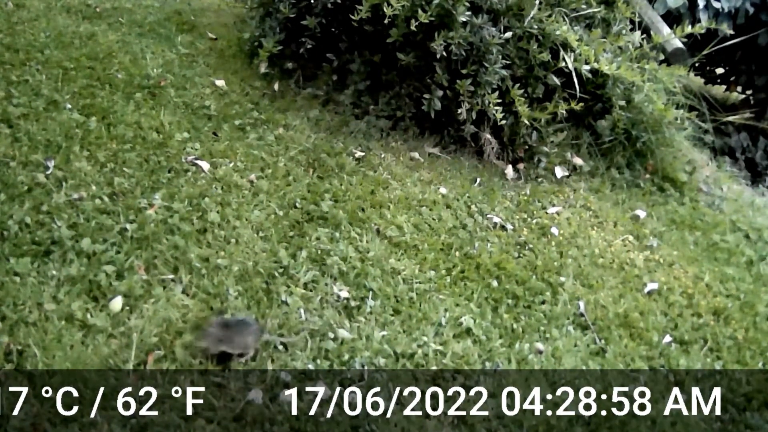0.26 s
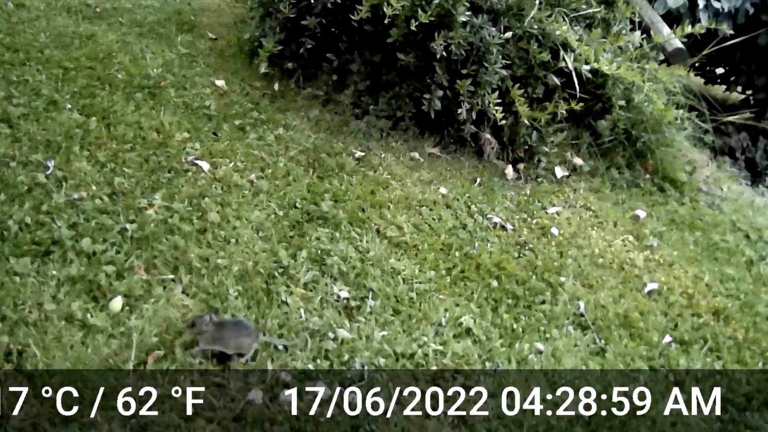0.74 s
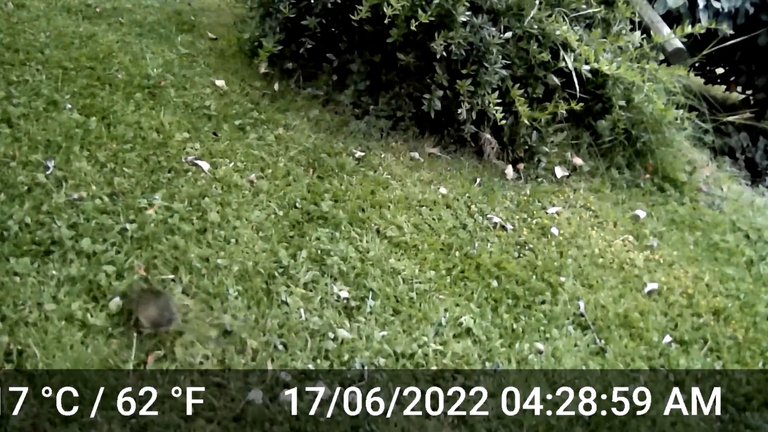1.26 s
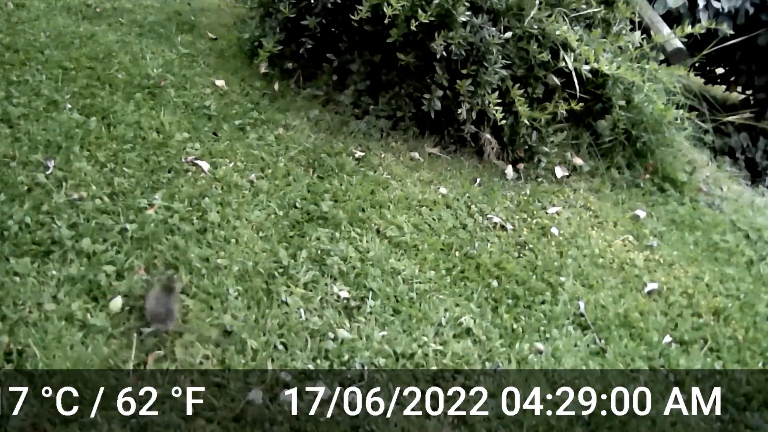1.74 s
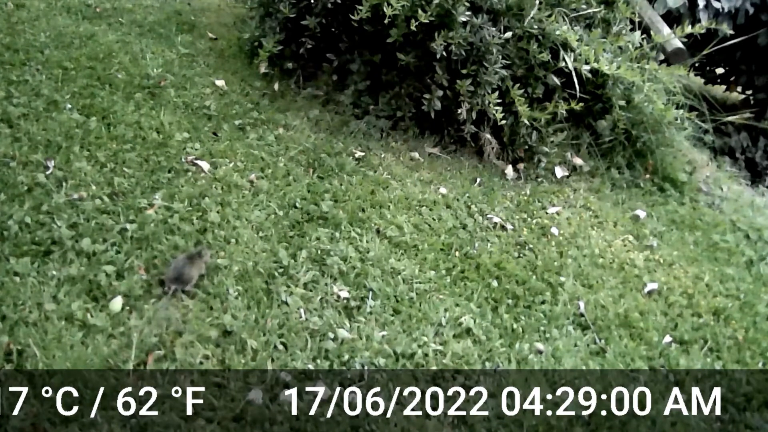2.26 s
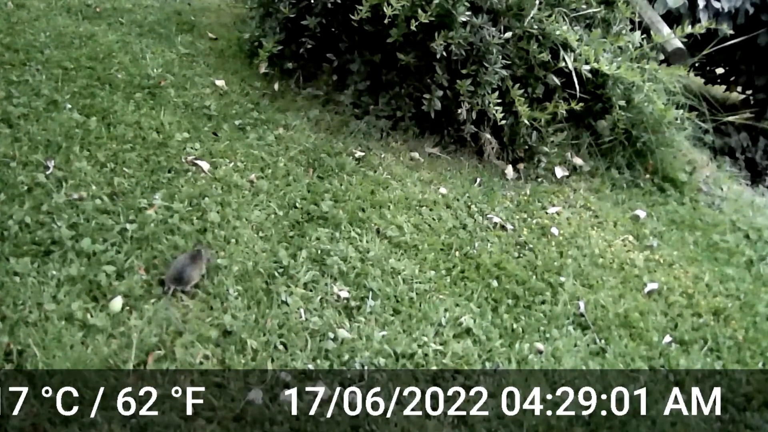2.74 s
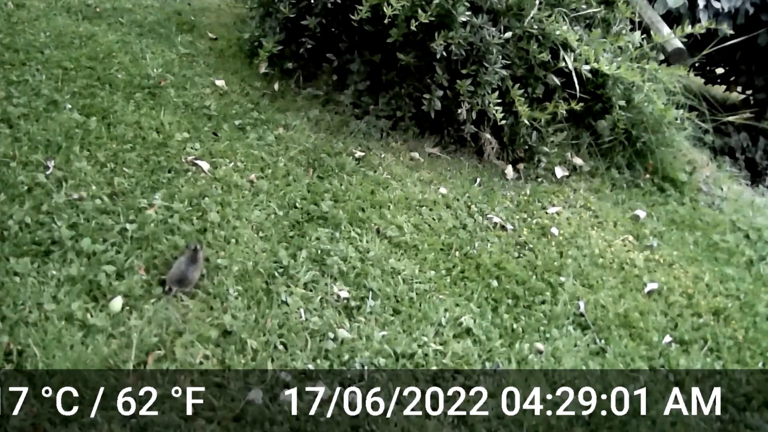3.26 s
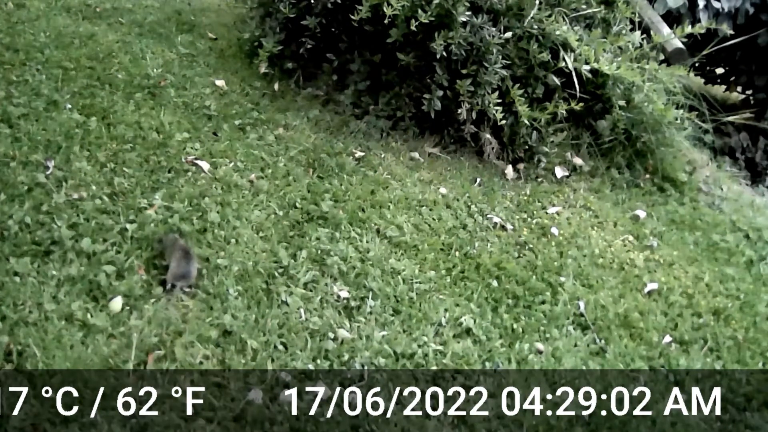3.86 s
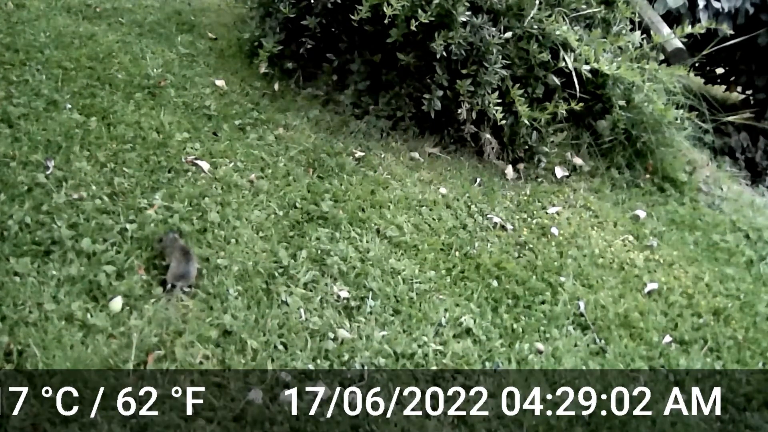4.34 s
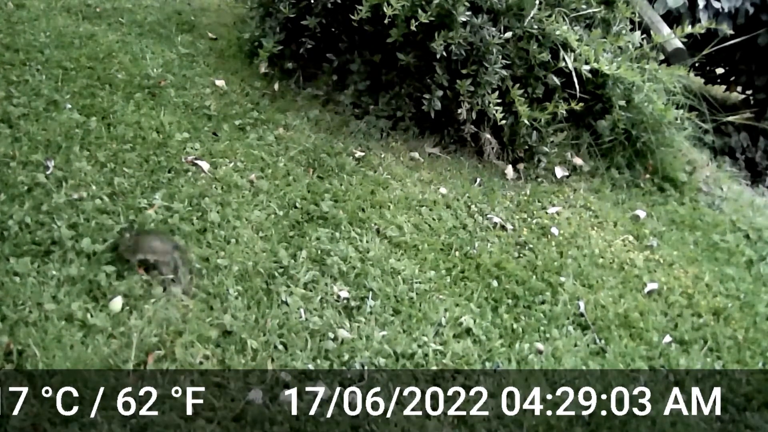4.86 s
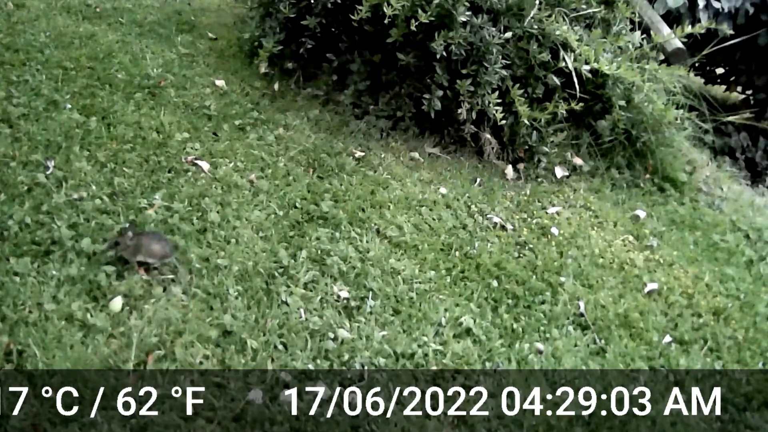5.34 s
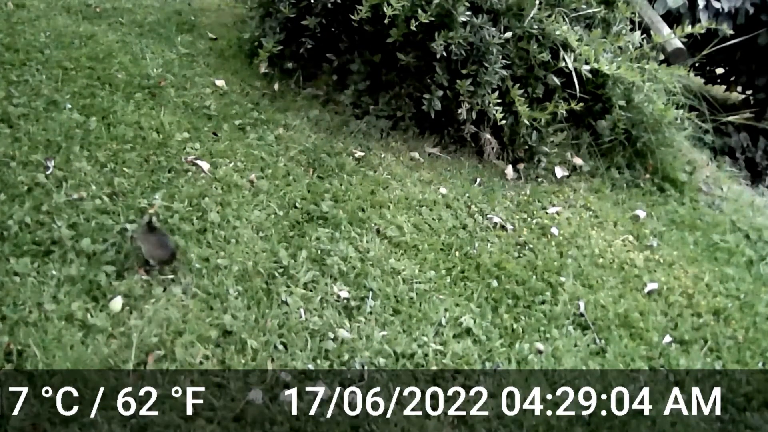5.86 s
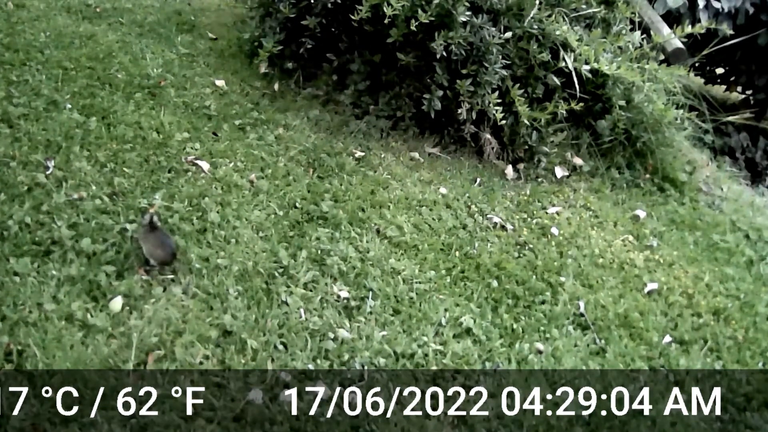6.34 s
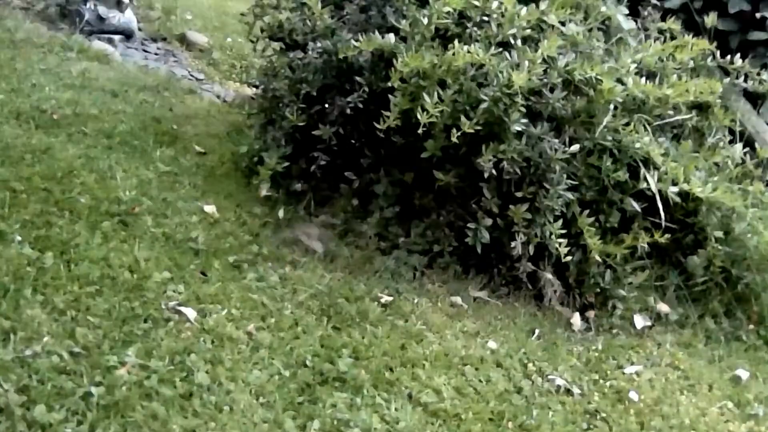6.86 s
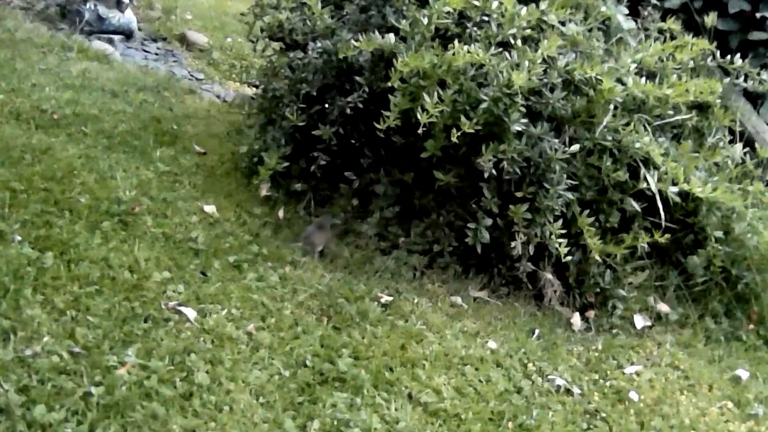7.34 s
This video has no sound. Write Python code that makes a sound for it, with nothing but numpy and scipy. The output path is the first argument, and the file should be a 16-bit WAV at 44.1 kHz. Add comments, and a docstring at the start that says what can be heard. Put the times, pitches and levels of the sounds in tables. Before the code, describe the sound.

A blackbird flutes among high chirps and slurred whistles outdoors, above faint hiss and distant traffic, before a sudden dropout.

```python
"""Dawn chorus over a garden lawn

A blackbird flutes while a robin and smaller birds whistle and chirp. Each note is a gliding near sine
from the syrinx that scatters in the shrubs and slaps back from a wall. Under them lie far birds, low
gusts or thuds, distant traffic and the hiss of a small wildlife camera, which cuts out near the end."""
import sys
import numpy as np
from scipy import signal
from scipy.fft import rfft, irfft
from scipy.io import wavfile

SR = 44100
rng = np.random.default_rng(int(sys.argv[2]) if len(sys.argv) > 2 else 0)


def unload_wav(signal):
    """Save mono or channel-first audio to the path in sys.argv[1] as 16-bit WAV at rate SR, clipped to [-1, 1]."""
    wavfile.write(
        sys.argv[1],
        SR,
        np.round(np.clip(np.atleast_2d(signal).T, -1, 1) * 32767).astype(np.int16),
    )


N = 335160
TIME = np.arange(N) / SR

# The two lead voices; levels are dry, and the swell is the change across the note: (time [s], level [dB],
# length [s], start pitch [Hz], middle pitch [Hz], end pitch [Hz], swell [dB], warble depth [Hz])
BLACKBIRD_NOTES = [ (1.61, -59, .125, 1486, 1636, 1696, 2.5, 36.5),
                   (1.745, -58.5, 0.093, 1693, 1698, 1643, 7, 187),
                   (1.868, -54, 0.13, 1900, 1890, 1860, 6.5, 11),
                   (2.0, -52.5, 0.12, 1720, 1817, 1773, -3.5, 269),
                   (2.218, -50.5, 0.12, 1902, 1905, 1937, 2.5, 2),
                   (2.302, -48, 0.073, 1950, 2000, 1964, -3, 19),
                   (2.37, -53, 0.083, 2020, 2014, 2033, 1, -1),
                   (2.403, -54, 0.06, 3010, 3005, 3040, 9, 8.5),
                   (2.465, -49, .14, 2963, 2994, 2967, 1.5, 47), (2.6, -55, 0.024, 3060, 2980, 2760, -5, 3),
                   (2.792, -53.5, 0.19, 2228, 2221, 2203, 1, -4.5),
                   (2.993, -49.5, 0.074, 2265, 2290, 2305, 7, -2),
                   (3.333, -56.5, 0.043, 1580, 1642, 1880, -9, -1),
                   (3.375, -51.5, 0.076, 1870, 1904, 1906, -2, 83),
                   (3.44, -53, 0.12, 1894, 1796, 1780, -14, 167),
                   (3.582, -51.5, 0.07, 1807, 1914, 2106, 0.5, -2.5),
                   (3.657, -59, .063, 1655, 1940, 2050, -4, -0.5),
                   (3.665, -54.5, .118, 2440, 2394, 2340, -1, 50),
                   (3.779, -48.5, .032, 2400, 2315, 1890, -4.5, 22.5),
                   (3.81, -55, 0.091, 2322, 2367, 2083, -5, 29), (5.6, -74, 0.13, 1480, 1540, 1584, 11, -2),
                   (5.778, -62.5, .09, 1720, 1735, 1784, 2, 4),
                   (5.89, -60.5, 0.26, 1730, 1655, 1696, 1.5, 24),
                   (6.133, -63, 0.1, 1757, 1733, 1820, 0, -3.5),
                   (6.265, -63, 0.046, 1180, 1230, 1400, 6, 79.5),
                   (6.295, -53, 0.093, 1580, 1710, 1780, -2.5, 370),
                   (6.618, -50.5, .1, 1377, 1635, 1850, 12.5, 1),
                   (6.727, -38, .035, 1960, 2030, 2135, -3, 0.5),
                   (6.76, -36, 0.092, 2143, 2145, 2150, 7.5, 16.5)]
ROBIN_NOTES = [ (5.55, -57.5, 0.042, 5800, 5620, 5170, 19.5, 179),
               (5.655, -72, 0.051, 6400, 6250, 6500, 1, 219.5),
               (5.684, -53.5, 0.039, 5700, 5730, 5870, -2.5, 231.5),
               (5.765, -62, 0.059, 4680, 4600, 4630, 12, 0),
               (5.811, -45.5, 0.019, 4510, 4574, 4560, -5.5, -2.5),
               (5.901, -47.5, 0.013, 5500, 5090, 4530, 7, -0.5), (5.93, -62.5, .06, 4200, 4316, 4314, 0, 0),
               (6.027, -58.5, 0.025, 6320, 6350, 6400, 8, 99),
               (6.054, -49.5, 0.025, 6500, 6530, 6600, -2.5, 189.5),
               (6.076, -56.5, .053, 6620, 6690, 6650, 2.5, 90),
               (6.139, -52, 0.024, 6370, 6500, 6400, -3.5, 350.5),
               (6.308, -46, 0.037, 4670, 4940, 5120, 4.5, 0.5),
               (6.334, -53.5, 0.044, 5290, 5450, 5600, -6.5, 381.5),
               (6.395, -59.5, 0.034, 7480, 7340, 7300, 2.5, 281),
               (6.395, -71.5, 0.028, 8300, 8600, 8240, -1, 151.5),
               (6.581, -51, .031, 6400, 5960, 5760, 5, 650.5),
               (6.608, -43, 0.036, 5200, 5190, 5110, -4.5, 45)]
# Far twittering phrases, same columns
TWITTER_NOTES = [(1.7, -80.5, .53, 4210, 3886, 3894, -1.5, 258),
                 (4.78, -79.5, .62, 3706, 4050, 3860, -11, 213)]
# A small bird's sinking whistles:
# (time [s], level [dB], length [s], start pitch [Hz], middle pitch [Hz], end pitch [Hz], swell [dB])
SINKING_WHISTLES = [(.074, -55.5, .066, 5010, 4730, 4690, -1), (.205, -62.5, 0.057, 4850, 4780, 4740, 10),
                    (1.573, -62.5, .03, 5730, 5490, 5260, 12), (1.601, -59, .07, 5310, 5060, 5095, -1)]
# Whistles from neighbouring gardens, same columns
NEIGHBOUR_WHISTLES = [ (.08, -68, 0.039, 3050, 2900, 2840, -3), (.132, -57.5, 0.016, 1540, 1460, 1530, -8),
                      (.17, -69, 0.039, 1590, 1585, 1560, 3), (.59, -71.5, 0.072, 6480, 6790, 6820, -6),
                      (1.22, -74, 0.17, 2310, 2330, 2360, -5), (1.318, -75.5, 0.066, 7200, 7350, 7740, 3),
                      (2.165, -69, 0.051, 6950, 6250, 5570, 18), (2.245, -74, 0.073, 5980, 5970, 5950, 9),
                      (2.96, -70, .165, 1900, 1920, 1860, 3), (3.645, -57.5, 0.018, 3050, 2930, 2980, 5),
                      (3.719, -47.5, 0.008, 3080, 2930, 2900, -7.5),
                      (3.75, -72, 0.16, 6120, 6300, 6040, -8), (3.89, -79.5, 0.083, 6310, 6150, 5820, -2),
                      (4.08, -73.5, 0.077, 4980, 5260, 5180, -1), (4.43, -77, 0.051, 2250, 2235, 2230, 8),
                      (4.6, -78.5, 0.24, 2050, 2055, 2023, -0.5), (4.785, -72.5, .03, 2900, 2940, 2980, 5),
                      (4.82, -73, 0.053, 2500, 2530, 2520, -7), (5.035, -69.5, 0.043, 2240, 2190, 2230, -4),
                      (5.295, -73.5, 0.096, 6800, 7020, 5270, 8.5),
                      (5.28, -74.5, .11, 2420, 2270, 2400, 6.5), (5.405, -69, 0.019, 1790, 1757, 1783, 1.5),
                      (5.52, -66.5, 0.087, 3170, 3280, 3570, 7), (5.62, -67.5, 0.15, 3480, 3170, 2990, -3),
                      (6.52, -60.5, 0.03, 2310, 2330, 2320, 4.5)]
# The small bird's slurs, two down and three up:
# (time [s], level [dB], length [s], start pitch [Hz], end pitch [Hz])
SLUR_NOTES = [(.247, -57, 0.074, 5610, 3593), (.412, -54.5, 0.076, 5740, 3380),
              (.848, -53.5, .064, 3950, 5680), (1.017, -52, 0.055, 3960, 5700),
              (1.185, -52.5, .057, 3886, 5560)]
# Quick falling ticks, same columns
TICK_NOTES = [(2.512, -64.5, 0.027, 5230, 3260), (2.726, -65.5, 0.033, 5190, 3280),
              (2.945, -69, 0.038, 5210, 3250), (3.163, -70, 0.041, 5100, 3250),
              (3.377, -66, 0.033, 5210, 3200), (4.37, -60.5, 0.042, 5900, 3850)]
# The robin's falling buzz:
# (length [s], start pitch [Hz], middle pitch [Hz], end pitch [Hz], swell [dB], warble depth [Hz])
BUZZ_SHAPE = (0.03, 4280, 3860, 3520, -3, 300)
# One rising chip: (length [s], start pitch [Hz], middle pitch [Hz], end pitch [Hz], swell [dB])
CHIP_SHAPE = (.037, 3400, 3680, 3880, 9)
# Cues for the buzz and the chip: (time [s], level [dB])
BUZZ_CUES = [(6.208, -50.5), (6.474, -52), (6.704, -48.5)]
CHIP_CUES = [(3.47, -58.5), (3.557, -62.5), (3.647, -59), (3.767, -76.5), (3.905, -58.5), (3.995, -57)]
# Hard reflections on each bird's way to the microphone: (delay [s], level [dB])
BLACKBIRD_SLAPS = [(.011, -10), (.031, -23), (.079, -14.5)]
ROBIN_SLAPS = [(.057, -6.5)]
SLUR_SLAPS = [(.009, -17.5), (.018, -10), (.114, -12.5), (.146, -11.5)]
NEIGHBOUR_SLAPS = [(.017, -11.5), (0.117, -9.5)]
TICK_SLAPS = [(0.016, -7.5), (0.028, -8), (.115, -5)]
# Tone curves of the far birds, the low rumble and the microphone hiss: (frequency [Hz], gain [dB])
CHORUS_EQ = [(1300, -10.5), (1650, -14), (2000, -8), (2300, 5.5), (2750, -9), (3700, -6), (4900, -10),
             (7000, -24)]
RUMBLE_EQ = [(11, -43), (18, -14), (49, 0), (108, -2.5), (162, -5), (200, -10.5), (265, -15.5), (299, -16),
             (426, -22), (1200, -34.5), (1560, -58), (2640, -120)]
HISS_EQ = [(300, -18), (700, 1), (1200, 0), (2000, -1), (3000, -6), (4500, -7.5), (6000, -8), (7200, -10.5),
           (8000, -19.5), (8600, -26.5), (9000, -45)]
# Low gusts or thuds: (peak time [s], width [s], change below 85 Hz [dB], change at 85-250 Hz [dB])
GUSTS = [(.53, 0.06, 5, -1), (.62, .06, -3, 8), (.7, 0.028, 12, -2), (1.0, 0.092, 6.5, 7),
         (1.15, 0.1, 10, 4.5), (1.29, 0.038, 13, 4.5), (1.78, .08, 4.5, 4), (2.19, 0.027, 11, 3),
         (2.811, 0.045, 5, 5), (3.42, 0.31, 10.5, -4), (3.76, 0.041, 11.5, 10.5), (4.0, .06, 10.5, 2.5),
         (4.1, 0.048, 14, 4), (4.56, 0.039, 14, -1), (5.0, 0.21, 1.5, 2.5), (5.68, .04, 4, 5),
         (6.12, 0.16, 1.5, 7), (6.239, 0.026, 13, -1.5)]
# Tones of far machinery: (frequency [Hz], level [dB])
MACHINE_TONES = [(62, -62), (113, -60.5), (308, -75), (570, -80.5)]
# The camera's sound channel shuts, then reopens very faintly: (time [s], gain [dB])
CHANNEL_GAIN = [(0, 0), (6.832, 0), (6.83215, -90), (7.21, -90), (7.22, -44), (7.26, -44), (7.27, -90),
                (7.325, -90), (7.335, -46), (7.6, -42)]


def blackbird():
    """Low fluting notes from a nearby tree; the scatter blurs each fast warble into a burr."""
    notes = arched(BLACKBIRD_NOTES, attack_s=.005, release_s=.0027, warble_grows_s=.015)
    song = syrinx(notes, waver=.004, flutter_db=4.5, warble_hz=56.4, warble_jitter=.2)
    return garden(song, BLACKBIRD_SLAPS, shrubs_db=-6.5, shrubs_s=.045, tail_db=-19, tail_t60=1.3)


def robin():
    """Quick high notes, some buzzing, from within the foliage, so the scatter is strong."""
    notes = arched(ROBIN_NOTES, attack_s=.0085, release_s=.003, warble_grows_s=.013)
    buzzes = arched(repeated(BUZZ_SHAPE, BUZZ_CUES), attack_s=.013, release_s=.003, warble_grows_s=.02)
    song = syrinx(notes + buzzes, waver=.0051, flutter_db=4.5, warble_hz=177, warble_jitter=.3)
    return garden(song, ROBIN_SLAPS, shrubs_db=-3, shrubs_s=.08, tail_db=-9, tail_t60=.71)


def slurring_bird():
    """Falling, then rising slurs between sinking whistles, each answered by the wall."""
    whistles = arched(SINKING_WHISTLES, attack_s=.007, release_s=.0045)
    slurs = slurred(SLUR_NOTES, throat_hz=4290, throat_octaves=.33, edge_s=.006)
    song = syrinx(whistles + slurs, waver=.022, flutter_db=3.5)
    return garden(song, SLUR_SLAPS, shrubs_db=2, shrubs_s=.031, tail_db=-8, tail_t60=.39)


def neighbours():
    """The middle distance: weaker whistles, chips, ticks and twitters from further off."""
    whistle_notes = arched(NEIGHBOUR_WHISTLES, attack_s=.0027, release_s=.008)
    chip_notes = arched(repeated(CHIP_SHAPE, CHIP_CUES), attack_s=.006, release_s=.004)
    tick_notes = slurred(TICK_NOTES, throat_hz=3750, throat_octaves=.84, edge_s=.0022)
    twitter_notes = arched(TWITTER_NOTES, attack_s=.065, release_s=.06)
    whistles = syrinx(whistle_notes, waver=.0046, flutter_db=4)
    chips = syrinx(chip_notes, waver=.016, flutter_db=7.5)
    ticks = syrinx(tick_notes, waver=.025, flutter_db=.5)
    twitter = syrinx(twitter_notes, waver=.02, flutter_db=6.5, warble_hz=16, warble_jitter=.25)
    return (garden(whistles, NEIGHBOUR_SLAPS, shrubs_db=-2.5, shrubs_s=.053, tail_db=-13.5, tail_t60=.83)
            + garden(chips, NEIGHBOUR_SLAPS, shrubs_db=-1.5, shrubs_s=.037, tail_db=-10.5, tail_t60=1)
            + garden(ticks, TICK_SLAPS, shrubs_db=0, shrubs_s=.016, tail_db=-3, tail_t60=1.9)
            + garden(twitter, NEIGHBOUR_SLAPS, shrubs_db=4, shrubs_s=.016, tail_db=1, tail_t60=1.8))


def syrinx(notes, waver, flutter_db, warble_hz=0, warble_jitter=.08):
    """A bird's voice: a near sine that glides, warbles and trembles; yields (first sample, wave)."""
    unsteady = 1 + waver * drift(250)
    tremble = from_db(flutter_db * drift(120))
    warble = np.sin(2 * np.pi * warble_hz * np.cumsum(1 + warble_jitter * drift(60)) / SR)
    edge = SR // 400   # 2.5 ms fades keep the ends from clicking
    for note in notes:
        times, hz, db, *depth = np.transpose(note)
        times = np.sort(times)
        span = slice(max(int(times[0] * SR) - edge // 2, 0), min(int(times[-1] * SR) + edge, N))
        t = TIME[span]
        pitch = np.interp(t, times, hz) * unsteady[span]
        if depth:
            pitch += np.interp(t, times, depth[0]) * warble[span]
        step = np.arange(len(t))
        from_edge = np.minimum(step, step[::-1])
        fade = np.sin(np.pi / 2 * np.minimum(from_edge / edge, 1)) ** 2
        envelope = np.sqrt(2) * fade * from_db(np.interp(t, times, db)) * tremble[span]
        yield span.start, envelope * np.sin(2 * np.pi * np.cumsum(pitch) / SR)


def arched(rows, attack_s, release_s, warble_grows_s=.01, points=40):
    """Notes that arch through three pitches, swelling or sinking while any warble builds up."""
    progress, notes = np.linspace(0, 1, points), []
    arch = 1 - (2 * progress - 1) ** 2
    for start, db, length, first, middle, last, swell, *depth in rows:
        t = progress * length
        hz = first + (last - first) * progress + (middle - (first + last) / 2) * arch
        level_db = db + swell * (progress - .5) + edges_db(t, attack_s, release_s)
        warble = [d * np.minimum(t / warble_grows_s, 1) for d in depth]
        notes.append(np.transpose([start + t, hz, level_db, *warble]))
    return notes


def slurred(rows, throat_hz, throat_octaves, edge_s, points=24):
    """Even sweeps in octaves, 10 dB weaker at throat_octaves from the throat's resonance."""
    notes = []
    for start, db, length, first, last in rows:
        t, hz = np.linspace(0, length, points), np.geomspace(first, last, points)
        off_resonance = np.log2(hz / throat_hz) / throat_octaves
        level_db = db - 10 * off_resonance ** 2 + edges_db(t, edge_s, edge_s)
        notes.append(np.transpose([start + t, hz, level_db]))
    return notes


def repeated(shape, cues):
    """One note shape sung again on each cue."""
    return [(*cue, *shape) for cue in cues]


def edges_db(t, attack_s, release_s, fade_db=10):
    """Attack and release: a note starts and ends fade_db below its hold."""
    return -fade_db * (np.maximum(1 - t / attack_s, 0) + np.maximum(1 - (t[-1] - t) / release_s, 0))


def garden(song, slaps, shrubs_db, shrubs_s, tail_db, tail_t60, paths=2000):
    """Direct sound, hard slaps, a short cloud of scatter from the shrubs and a tail from far trees."""
    out, longest = np.zeros(N + 2 * SR), SR * 2 // 3
    for start, wave in song:
        # the bird turns between notes, so each finds its own paths
        lag = (longest * rng.random(paths) ** 2).astype(int)
        t = lag / SR
        weight = (lag + 1) ** (1 / 4)   # late paths are sparser, so each carries more
        shrubs = weight * np.minimum(t / .011, 1) * np.exp(-(t / shrubs_s) ** 2)
        tail = weight * np.minimum(t / .06, 1) * from_db(-60 * t / tail_t60)
        scatter = np.hypot(from_db(shrubs_db) * rms_one(shrubs), from_db(tail_db) * rms_one(tail))
        response = np.bincount(lag, scatter / np.sqrt(paths) * rng.standard_normal(paths), longest)
        for delay, db in [(.00058, 0), *slaps]:   # the direct path comes first
            response[int(delay * SR)] += from_db(db)
        heard = signal.fftconvolve(wave, response)
        # scattering spreads a note's energy in time, whatever its pitch
        makeup = np.linalg.norm(wave) * np.linalg.norm(response) / np.linalg.norm(heard)
        out[start:start + len(heard)] += makeup * heard
    return out[:N]


def far_chorus(dry_db, spread_db, count):
    """A wash of distant birds: random short glides, heard almost only as reverb."""
    notes = []
    for when, register, length, glide, loudness in rng.random((count, 5)):
        start, hz = when * TIME[-1], 1400 * 5 ** register
        db = dry_db + 20 * np.log10(eq_gain(CHORUS_EQ, hz)) + spread_db * (loudness - .5)
        length_s, bend = .05 + .13 * length, .25 * (glide - .5)
        notes.append([(start, hz * (1 - bend), db), (start + length_s, hz * (1 + bend), db)])
    song = syrinx(notes, waver=.02, flutter_db=4)
    return garden(song, [], shrubs_db=10, shrubs_s=.047, tail_db=9.5, tail_t60=1.5)


def gusts_and_traffic_hum(gust_db, hum_db, upper_gain_db):
    """Low gusts or thuds below 85 Hz over distant traffic hum, which is steady above 250 Hz."""
    gust_ride_db = gust_db + 2.5 * drift(13)
    hum_ride_db = hum_db + .7 * drift(9)
    for peak, width, gust_change, hum_change in GUSTS:
        bell = .5 ** ((2 * (TIME - peak) / width) ** 2)
        gust_ride_db += gust_change * bell
        hum_ride_db += hum_change * bell
    rumble = noise(RUMBLE_EQ)
    sub = signal.sosfiltfilt(signal.butter(4, 85, fs=SR, output="sos"), rumble)
    lows = signal.sosfiltfilt(signal.butter(4, 250, fs=SR, output="sos"), rumble)
    gusts = from_db(gust_ride_db) * rms_one(sub)
    hum = from_db(hum_ride_db) * rms_one(lows - sub)
    return gusts + hum + from_db(upper_gain_db) * (rumble - lows)


def machinery(waver_db):
    """Far machines drone: low sines that waver in level and phase."""
    return sum(from_db(db + waver_db * drift(2.9)) * np.sin(2 * np.pi * hz * TIME + drift(5.5))
               for hz, db in MACHINE_TONES)


def microphone_hiss(level_db):
    """The microphone's own even noise floor."""
    return from_db(level_db) * noise(HISS_EQ)


def noise(eq):
    """Steady noise of this colour, rms 1."""
    hz = np.arange(N // 2 + 1) * SR / N
    return rms_one(irfft(rfft(rng.standard_normal(N)) * eq_gain(eq, hz), N))


def eq_gain(eq, hz):
    """Gain of a tone curve at these frequencies."""
    freq, db = np.transpose(eq)
    return from_db(np.interp(np.log(np.maximum(hz, 1)), np.log(freq), db))


def drift(rate_hz):
    """Random modulation around zero, with a spread of about 1."""
    knots = rng.standard_normal(8192)
    return np.interp(TIME * rate_hz, np.arange(len(knots)), knots)


def from_db(db):
    return 10 ** (np.asarray(db) / 20)


def rms_one(x):
    return x / np.sqrt(np.mean(x ** 2) + 1e-20)


def scene():
    """The mono mix: birds from near to far over a bed of gusts, traffic, machines and hiss."""
    birds = blackbird() + robin() + slurring_bird() + neighbours()
    chorus = far_chorus(dry_db=-84, spread_db=9, count=190)
    low_end = gusts_and_traffic_hum(gust_db=-58, hum_db=-56.5, upper_gain_db=-51)
    bed = low_end + machinery(waver_db=5) + microphone_hiss(level_db=-65.5)
    return (birds + chorus + bed)[None]


def record(dry):
    """The camera cuts the top, its converter adds a trace of noise, and the channel drops out."""
    narrow = signal.sosfilt(signal.cheby2(14, 60, 9507, fs=SR, output="sos"), dry)
    converter_noise = from_db(-97) * rng.standard_normal(N)
    gain_db = np.interp(TIME, *np.transpose(CHANNEL_GAIN))
    gated = (narrow + converter_noise) * from_db(gain_db)
    return signal.sosfilt(signal.cheby2(12, 60, 16500, fs=SR, output="sos"), gated)


dry = scene()
out = record(dry)
unload_wav(out)
```